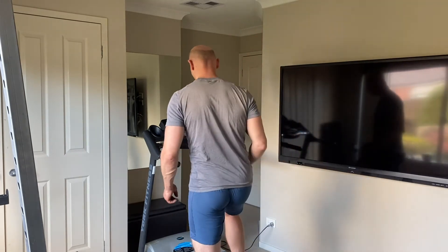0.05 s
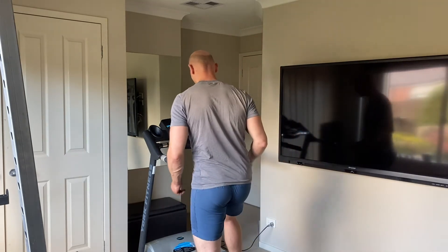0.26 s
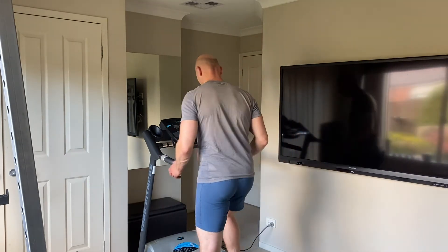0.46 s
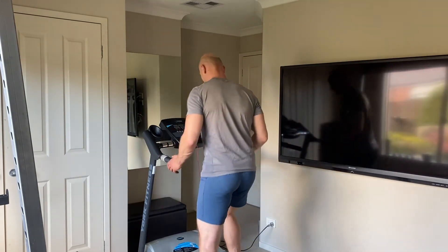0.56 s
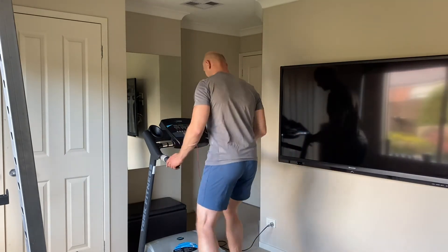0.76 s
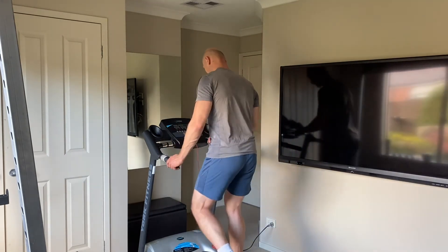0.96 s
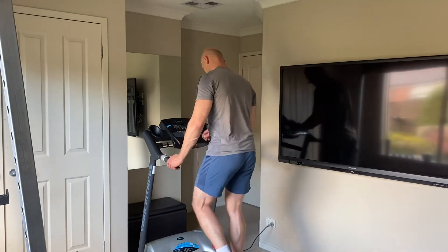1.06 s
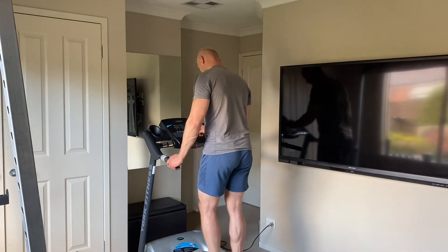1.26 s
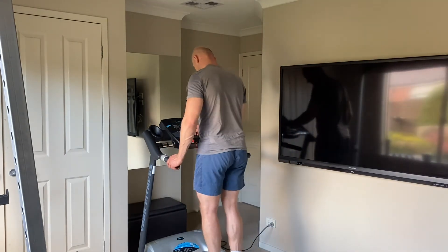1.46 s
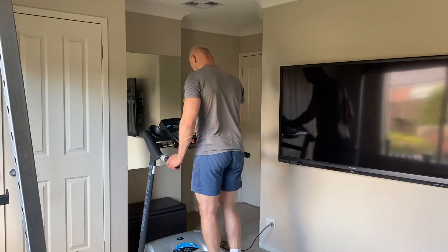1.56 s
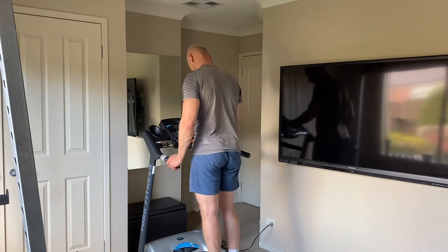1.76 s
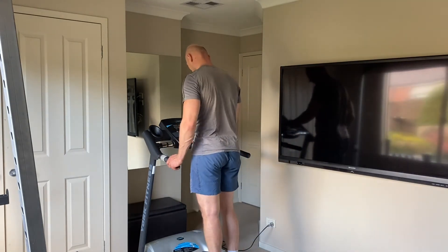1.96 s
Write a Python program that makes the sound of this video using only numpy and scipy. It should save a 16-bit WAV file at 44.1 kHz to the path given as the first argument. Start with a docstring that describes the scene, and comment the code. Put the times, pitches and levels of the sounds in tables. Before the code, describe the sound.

Low, booming footfalls land on a treadmill that is not running, in two short bunches. Light shoe scuffs, faint knocks and a soft clothing rustle go with them, heard from a few steps away in a quiet, slightly reverberant room.

```python
"""The hollow deck of a stopped treadmill booms under a few footsteps in a small, quiet room.
Each footfall is an impact: the sole slaps the belt and the load excites the deck's damped modes.
As the walker turns, friction makes the soles scuff and thinly squeal. The frame ticks, and the deck
gives faint hollow knocks and taps, single or in a brief creaky cluster. Clothes rustle, over the
room's reverberation and low rumble."""
import sys
import numpy as np
from scipy import signal
from scipy.fft import rfft, irfft
from scipy.io import wavfile

SR = 44100
rng = np.random.default_rng(int(sys.argv[2]) if len(sys.argv) > 2 else 0)


def unload_audio(sound):
    """Save the sound as a 16-bit wav file, at the path given as the first command line argument."""
    columns = np.transpose(np.atleast_2d(sound))
    # keep every value between -1 and 1, then stretch to whole-number steps
    steps = np.round(np.clip(columns, -1, 1) * 32767)
    wavfile.write(sys.argv[1], SR, steps.astype(np.int16))


N = 88200
TIME = np.arange(N) / SR
EVENT_SIZE = 16384  # samples

# spectrum of the still room: frequency_hz, relative_density_db
AIR_SPECTRUM = [(20, -10), (35, 0), (58, 5.5), (90, 0.5), (150, -7.5), (260, -18), (400, -24.5),
                (800, -19.5), (2000, -27), (5000, -31), (11500, -37.5), (13000, -43), (16000, -76)]
AIR_DB = -72.5
# envelope of the rustling clothes: time_s, level_db
RUSTLE_ENVELOPE = [(0, -75), (.2, -77), (.42, -53), (.62, -64), (.78, -62.5), (.9, -70), (1.05, -63),
                   (1.4, -99), (1.7, -56), (1.88, -102), (2, -104)]
# spectrum of the cloth: frequency_hz, gain_db
RUSTLE_SPECTRUM = [(300, 25), (1000, 0.5), (2800, -0.5), (4500, -8.5), (7000, -9), (11000, -9),
                   (16000, -22)]
# a sole hits the belt: start_s, level_db, settling_s, tilt_db_per_octave
SOLE_IMPACTS = [(0.211, -19, 0.042, -8.5), (0.24, -15, 0.0027, -8), (0.272, -18.5, 0.0076, -6),
                (0.386, -17.5, 0.011, -2), (0.476, -18.5, 0.012, -6.5), (0.564, -20.5, 0.015, -8),
                (1.050, -19, 0.0039, -3.5), (1.215, -9.5, 0.002, -6), (1.412, -17.5, 0.0039, -6.5),
                (1.467, -13, 0.015, -6.5), (1.54, -20, 0.0038, -6.5)]
# spectrum of a slap: frequency_hz, gain_db
SLAP_SPECTRUM = [(100, -11.5), (250, -8.5), (430, -3.5), (600, -5.5), (850, 1.5), (1300, -2), (2200, -2.5),
                 (3600, -10.5), (7000, -13.5), (11000, -36), (16000, -49)]
SLAP_GRAINS_PER_S, SLAP_CRACK = 3000, 0.4
# heel, ball or shifting weight loads the deck: start_s, level_db, bass_gain_db
DECK_LOADS = [(0.2294, -39.4, 8.1), (0.2664, -45.3, 7.4), (0.3896, -35.7, -6.2), (0.4174, -34.8, -9.5),
              (0.4641, -49.1, -3.9), (0.502, -35.9, -5.0), (0.5612, -39.8, -6.5), (0.6021, -38.9, -5.5),
              (0.8453, -65.3, 16.6), (0.9402, -69.7, 18.7), (1.0389, -51.2, 3.9), (1.0548, -37.7, -13.1),
              (1.0737, -36.3, -3.3), (1.223, -38.2, 0.9), (1.2867, -45.1, 0.7), (1.4185, -37.1, -8.5),
              (1.441, -34.1, -10.5), (1.4882, -34.5, -5.5), (1.5455, -45.8, 5.5), (1.6775, -49.4, 5.1),
              (1.7814, -57.1, 13.1)]
# modes of the deck: pitch_hz, level_db, t60_s, left_lead_rad
DECK_MODES = [(65.2, -14.4, 0.62, 0.0), (75.3, -20.0, 0.43, 0.0), (102.0, -12.9, 0.5, -0.1),
              (143.0, -12.3, 0.6, 0.0), (158.4, -11.6, 0.42, 0.0), (193.5, -12.9, 0.16, -0.5),
              (215.3, 0.6, 0.38, 0.0), (222.3, -12.2, 0.48, 0.0), (258.3, -4.9, 0.29, -0.3),
              (270.1, -9.9, 0.25, -0.3), (295.6, -18.8, 0.59, 0.2), (358.5, -15.1, 0.46, -1.5),
              (523.6, -22.0, 0.52, 1.0)]
DECK_SWELL_S, BASS_EDGE_HZ, MODE_SPREAD_DB = .009, 175, .5
# spectrum of the foot's dull push: frequency_hz, gain_db
BOOM_SPECTRUM = [(22, -24), (35, -28), (48, -16.5), (65, -10), (120, -14.5), (200, 3.5), (270, -5),
                 (340, -2), (450, -14), (700, -17), (1500, -48)]
BOOM_GAIN_DB, BOOM_DECAY_S = 13, .02
# a sole drags over the belt: start_s, attack_s, hold_s, release_s, level_db, tilt_db_per_octave
SOLE_DRAGS = [(0.235, 0.031, 0.015, 0.045, -63.5, 2), (1.150, 0.003, 0.015, 0.025, -56.5, 1.5),
              (1.152, 0.0073, 0.038, 0.016, -46.5, -0.07), (1.30, 0.0076, 0.055, 0.072, -71, 0.5),
              (1.48, 0.033, 0.043, 0.032, -60, 1.5), (1.660, 0.006, 0.059, 0.011, -55, -0.1)]
# spectrum of a scuff: frequency_hz, gain_db
SCUFF_SPECTRUM = [(150, -17.5), (400, 5.5), (580, 2), (750, 10), (1050, 0), (2100, -0.5), (3300, -12.5),
                  (5500, -15.5), (8000, -32), (12000, -26), (16000, -48)]
SCUFF_GRAINS_PER_S, GRAIN_SPREAD_DB = 700, 3
# sharp ticks of the frame: start_s, level_db, centre_hz, width_octaves
FRAME_TICKS = [(0.384, -29, 9900, 3.6), (0.4976, -28, 4440, 0.59), (0.507, -29.5, 5670, 0.31),
               (1.5273, -30, 3330, 0.38)]
# faint knocks and taps of the deck, single or clustered: start_s, level_db, length_s
DECK_KNOCKS = [(0.858, -34.5, .03), (0.967, -42, .03), (1.014, -33, .005), (1.277, -27.5, .005),
               (1.429, -24.5, .005)]
# spectrum of a hollow knock: frequency_hz, gain_db
KNOCK_SPECTRUM = [(200, -34), (700, -4.5), (1100, -5.5), (1420, 2), (1900, -9.5), (3000, -36.5),
                  (8000, -46)]
NOMINAL_KNOCKS_PER_S, KNOCK_LOSS_DB_PER_S = 55, 269
# squeal of the sliding sole: time_s, pitch_hz, level_db
SQUEAL_GLIDE = [(1.219, 5100, -88), (1.254, 4980, -75), (1.321, 4730, -72), (1.37, 4580, -84),
                (1.40, 4600, -79)]
SQUEAL_HALF_WIDTH_HZ = 120
# reverberation time of the room: frequency_hz, t60_s
ROOM_DECAY = [(60, 0.93), (200, 1), (400, 0.52), (800, 0.47), (2000, 0.37), (5000, 0.52), (14000, 0.26)]
# likeness of left and right in the room: frequency_hz, correlation
ROOM_COHERENCE = [(50, 0.97), (140, 0.71), (250, 0.73), (400, -0.029), (800, -0.11), (1600, -0.0024),
                  (3000, 0.44), (6000, 0.13), (12000, 0.15)]
ROOM_BUILD_S = 0.0005
DIRECT_GAIN, PAN_DB = 0.37, 1.02
TICK_DIRECT_GAIN, TICK_PAN_DB = .46, 1.1
LOW_CUT_HZ, STOPBAND_HZ = 42, 16800


def from_db(db):
    """Amplitude ratio of a level in decibels."""
    return 10 ** (np.asarray(db) / 20)


def unit(x):
    """Normalisation to unit energy."""
    return x / np.sqrt(np.sum(x ** 2) + 1e-20)


def at_hz(points, hz):
    """Interpolation on a log-frequency axis."""
    frequency, value = np.transpose(points)
    return np.interp(np.log(np.maximum(hz, 1)), np.log(frequency), value)


def add(track, start_s, sound):
    """Superposition of a sound on the track."""
    start = int(start_s * SR)
    track[..., start:start + sound.shape[-1]] += sound[..., :N - start]


def coloured(x, gain_db):
    """Minimum-phase filtering: a causal response of unit energy, shaped by gain_db(hz)."""
    cepstrum = irfft(gain_db(np.fft.rfftfreq(EVENT_SIZE, 1 / SR)) * np.log(10) / 20)
    cepstrum[1:EVENT_SIZE // 2] *= 2
    cepstrum[EVENT_SIZE // 2 + 1:] = 0
    response = unit(irfft(np.exp(rfft(cepstrum))))
    return signal.fftconvolve(x, response)[:len(x)]


def tilted(spectrum, db_per_octave=0):
    """Spectral tilt about 1 kHz, as a gain curve in decibels."""
    return lambda hz: at_hz(spectrum, hz) + db_per_octave * np.log2(np.maximum(hz, 200) / 1000)


def grains(per_s, size):
    """Shot noise: random tiny clicks of uneven strength, at unit rms."""
    strength = from_db(GRAIN_SPREAD_DB * np.minimum(rng.exponential(1, size), 3))
    polarity = rng.choice([-1, 1], size)
    occurs = rng.random(size) < per_s / SR
    return unit(strength * polarity * occurs) * np.sqrt(size)


def diffuse(size):
    """Diffuse field: frequencies and spectra of white noise, partly coherent between the ears."""
    hz = np.fft.rfftfreq(size, 1 / SR)
    alike = at_hz(ROOM_COHERENCE, hz)
    mid, side = rfft(rng.standard_normal((2, size)))
    return hz, (np.sqrt(1 + alike) * mid + np.sqrt(1 - alike) * side * [[1], [-1]]) / np.sqrt(2)


def in_room(x, direct_gain):
    """Reverberation: the direct sound plus a diffuse tail, each octave decaying at its own rate."""
    t, tail = TIME[:2 * EVENT_SIZE], 0
    hz, noise = diffuse(len(t))
    octave = np.log2(np.clip(hz, 62.5, 16000) / 62.5)
    build = 1 - np.exp(-t / ROOM_BUILD_S)
    for k in range(9):
        band = irfft(noise * np.maximum(1 - abs(octave - k), 0))
        fade = from_db(-60 * t / at_hz(ROOM_DECAY, 62.5 * 2 ** k))
        tail = tail + band * unit(fade * build)
    return direct_gain * x + signal.fftconvolve(x[None], tail, axes=1)[:, :N]


def room_air():
    """Ambient noise: a steady diffuse field of low rumble and faint hiss."""
    hz, noise = diffuse(N)
    floor = irfft(noise * from_db(at_hz(AIR_SPECTRUM, hz)))
    return from_db(AIR_DB) * floor / floor.std()


def clothes_rustle():
    """Amplitude-modulated noise: the soft hiss of cloth swells and fades as it moves."""
    hiss = coloured(rng.standard_normal(N), tilted(RUSTLE_SPECTRUM))
    return hiss * from_db(np.interp(TIME, *np.transpose(RUSTLE_ENVELOPE)))


def sole_slaps():
    """Impact noise: a first crack, then a dying patter as the tread settles on the belt."""
    out = np.zeros(N)
    for start_s, level_db, settling_s, tilt in SOLE_IMPACTS:
        contact = unit(grains(SLAP_GRAINS_PER_S, EVENT_SIZE) * np.exp(-TIME[:EVENT_SIZE] / settling_s))
        contact[0] += SLAP_CRACK
        add(out, start_s, from_db(level_db) * coloured(unit(contact), tilted(SLAP_SPECTRUM, tilt)))
    return out


def deck_boom():
    """Modal vibration: each load excites the deck's damped modes and sends a dull push into the room."""
    rings, pushes, t = np.zeros((2, N)), np.zeros(N), TIME[:2 * EVENT_SIZE]
    swell = 1 - np.exp(-t / DECK_SWELL_S)
    sides = np.array([[.5], [-.5]])
    modes = np.array([from_db(db - 60 * t / t60) * swell * np.sin(2 * np.pi * hz * t + lead * sides)
                      for hz, db, t60, lead in DECK_MODES])
    mode_hz = np.array(DECK_MODES)[:, 0]
    bass_share = 1 / (1 + (mode_hz / BASS_EDGE_HZ) ** 6)  # near one for the deep modes
    for start_s, level_db, bass_gain_db in DECK_LOADS:
        scatter_db = MODE_SPREAD_DB * rng.standard_normal(len(modes))
        strengths = from_db(level_db + bass_gain_db * bass_share + scatter_db)
        add(rings, start_s, np.tensordot(strengths, modes, axes=1))
        burst = rng.standard_normal(EVENT_SIZE) * np.exp(-TIME[:EVENT_SIZE] / BOOM_DECAY_S)
        push = unit(coloured(burst, tilted(BOOM_SPECTRUM)))
        add(pushes, start_s, from_db(level_db + BOOM_GAIN_DB) * push)
    return rings + in_room(pushes, DIRECT_GAIN)


def sole_scuffs():
    """Sliding friction: rubber catches and lets go on the belt's texture."""
    out, t = np.zeros(N), TIME[:EVENT_SIZE]
    for start_s, attack_s, hold_s, release_s, level_db, tilt in SOLE_DRAGS:
        pressure = np.minimum(t / attack_s, 1) * np.exp(-np.maximum(t - attack_s - hold_s, 0) / release_s)
        friction = grains(SCUFF_GRAINS_PER_S, EVENT_SIZE) * pressure
        add(out, start_s, from_db(level_db) * coloured(friction, tilted(SCUFF_SPECTRUM, tilt)))
    return out


def frame_ticks():
    """Impulse response: each tick is a single click through one broad resonance."""
    out = np.zeros(N)
    for start_s, level_db, centre_hz, width_octaves in FRAME_TICKS:
        peak_db = lambda hz: -20 * np.log10(1 + (np.log2((hz + 1) / centre_hz) / width_octaves) ** 2)
        add(out, start_s, from_db(level_db) * coloured(signal.unit_impulse(EVENT_SIZE), peak_db))
    return out


def deck_knocks():
    """Impulsive excitation: faint hollow knocks and taps, single or in a brief creaky cluster."""
    clicks = np.zeros(N)
    for start_s, level_db, length_s in DECK_KNOCKS:
        gaps = rng.uniform(0.17, 1.7, size=12) / NOMINAL_KNOCKS_PER_S
        delays = np.cumsum(gaps) - gaps[0]
        for delay in delays[delays < length_s]:
            clicks[int((start_s + delay) * SR)] += from_db(level_db - KNOCK_LOSS_DB_PER_S * delay)
    return coloured(clicks, tilted(KNOCK_SPECTRUM))


def sole_squeal():
    """Narrow-band friction noise: a rough tone that sinks as the sole slows."""
    time_s, pitch_hz, level_db = np.transpose(SQUEAL_GLIDE)
    lowpass = signal.butter(2, SQUEAL_HALF_WIDTH_HZ, fs=SR, output="sos")
    rough = signal.sosfilt(lowpass, rng.standard_normal((2, N)))
    phase = 2 * np.pi * np.cumsum(np.interp(TIME, time_s, pitch_hz)) / SR
    tone = rough[0] * np.cos(phase) - rough[1] * np.sin(phase)
    sliding = (TIME > time_s[0]) & (TIME < time_s[-1])
    return tone / tone.std() * from_db(np.interp(TIME, time_s, level_db)) * sliding


def scene():
    """Superposition of all sources, with the walker's noises and the ticks a little to the left."""
    walker = sole_slaps() + sole_scuffs() + deck_knocks() + sole_squeal() + clothes_rustle()
    walker = in_room(walker, DIRECT_GAIN) * from_db([[PAN_DB], [-PAN_DB]])
    frame = in_room(frame_ticks(), TICK_DIRECT_GAIN) * from_db([[TICK_PAN_DB], [-TICK_PAN_DB]])
    return deck_boom() + walker + frame + room_air()


def record(dry):
    """Band limiting: the microphone loses the deepest bass, and the highest treble is cut."""
    thinned = signal.sosfilt(signal.butter(3, LOW_CUT_HZ, "high", fs=SR, output="sos"), dry)
    return signal.sosfilt(signal.cheby2(12, 60, STOPBAND_HZ, fs=SR, output="sos"), thinned)


dry = scene()
out = record(dry)
unload_audio(out)
```